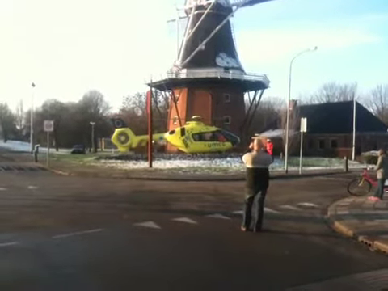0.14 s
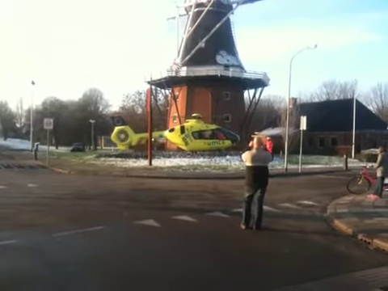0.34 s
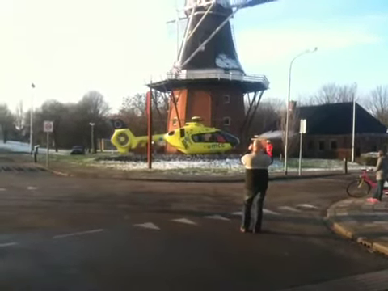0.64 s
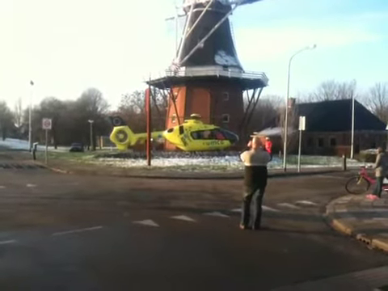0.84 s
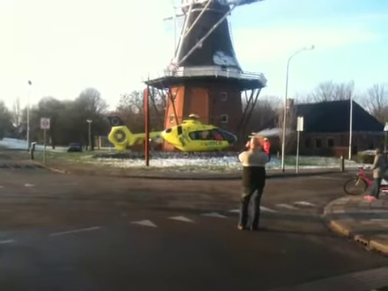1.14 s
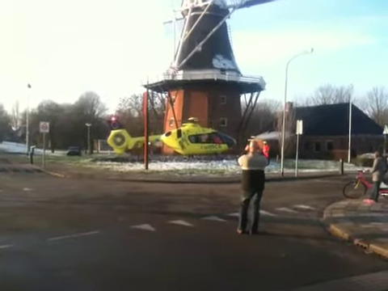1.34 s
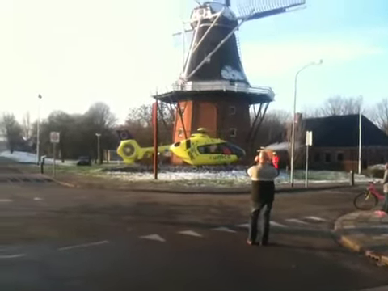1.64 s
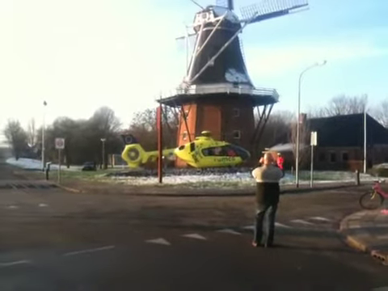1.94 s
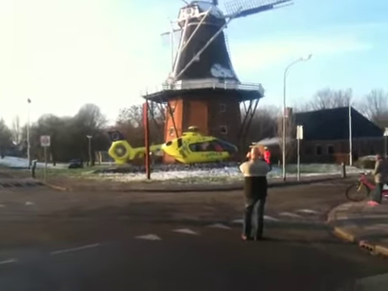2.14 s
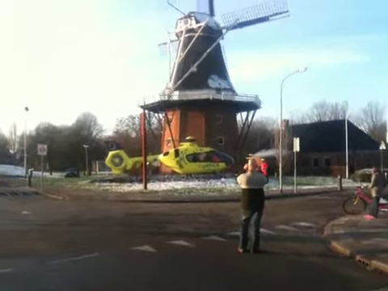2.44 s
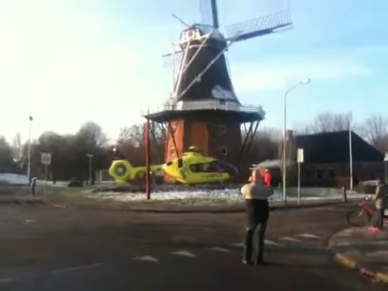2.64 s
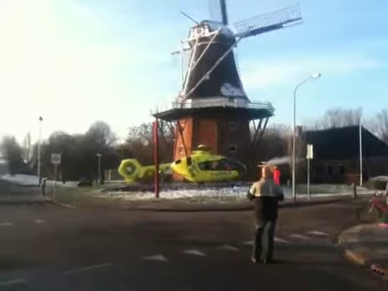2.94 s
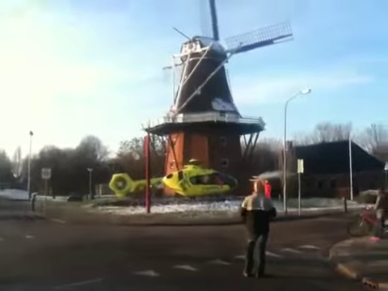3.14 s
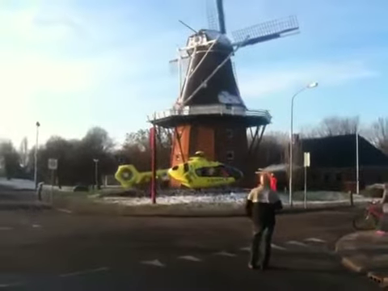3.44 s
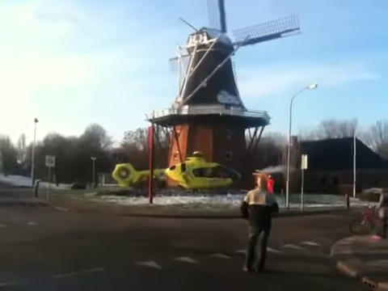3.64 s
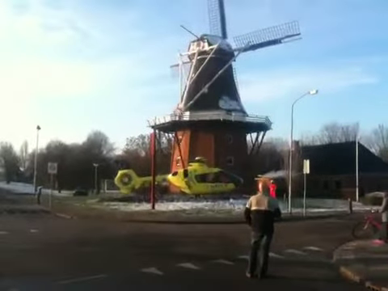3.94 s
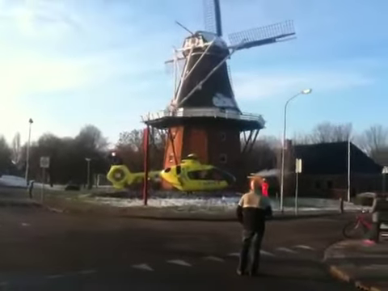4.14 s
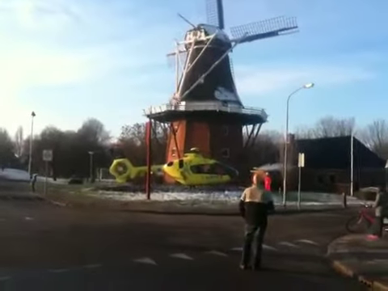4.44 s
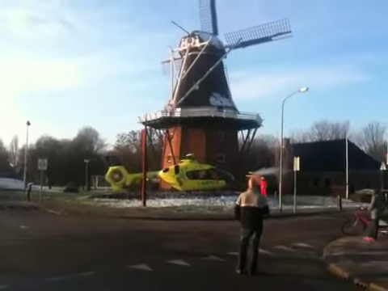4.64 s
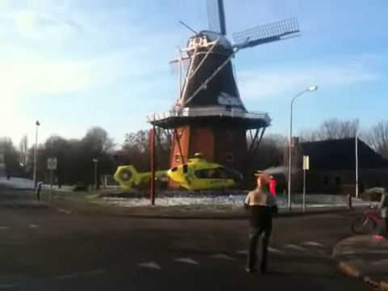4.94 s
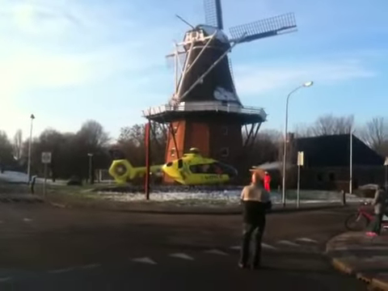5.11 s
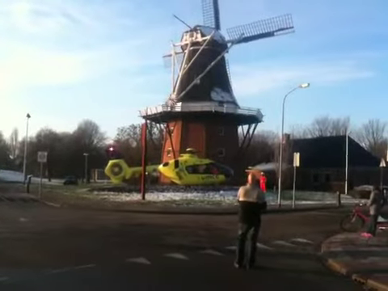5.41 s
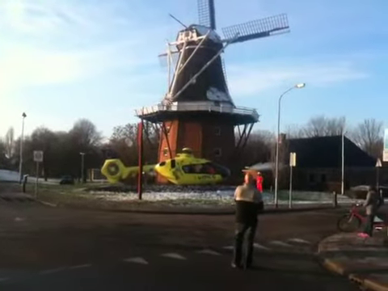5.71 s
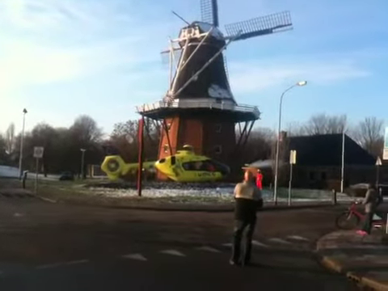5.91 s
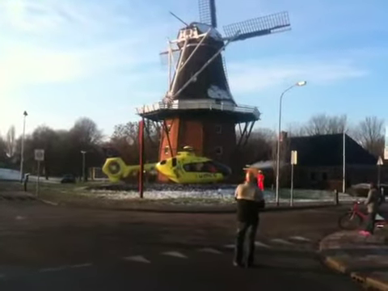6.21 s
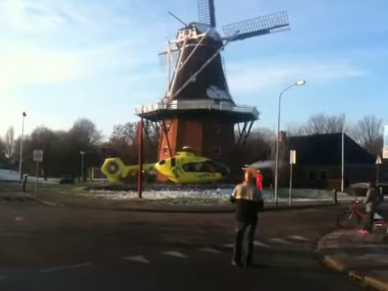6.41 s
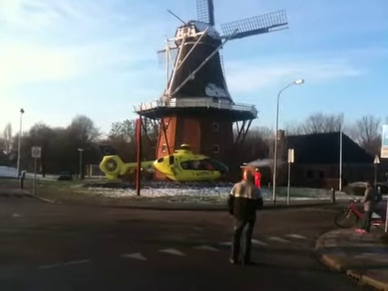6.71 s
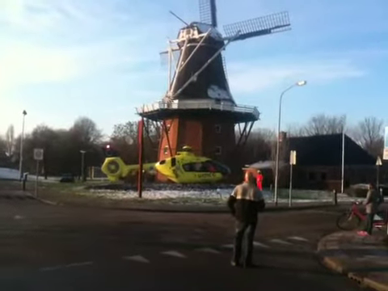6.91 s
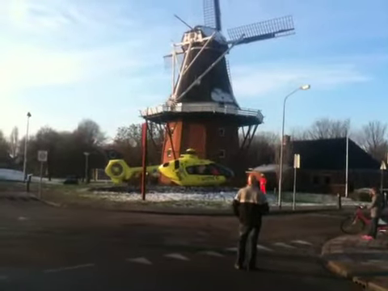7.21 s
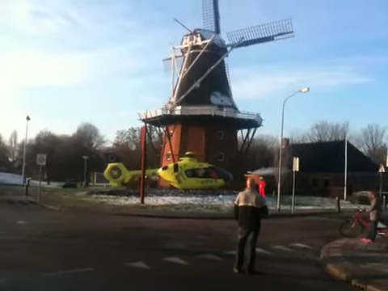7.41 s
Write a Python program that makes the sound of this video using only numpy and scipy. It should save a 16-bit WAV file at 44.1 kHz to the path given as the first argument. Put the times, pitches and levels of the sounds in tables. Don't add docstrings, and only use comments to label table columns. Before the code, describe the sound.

A helicopter stands idling across an open square, its turbines making a continuous broad jet hiss over a steady low combustor rumble, mostly around 140 to 350 Hz. Thin whines waver inside it: a very high compressor tone near 9.8 kHz and weaker gear and pump tones between 1.4 and 2 kHz. From 0 to 3.2 seconds the hiss is loud, close and hollow, coloured by a very short echo from a hand cupped by the microphone; a breathy whistle near 5 kHz opens it and fades by 0.3. At about 2.4 the hollow colour opens a little, with faint whistles around 2 and 3. Between 3.2 and 3.4 the hand leaves and the hiss drops, quieter and more natural. Until 7.5 it sways by a few decibels, swelling near 4, 5 and 6.6, dipping between, with faint whistles. Mono, with grainy, thinned treble and tiny stray side bursts.

```python
import sys
import numpy as np
from scipy import signal
from scipy.fft import rfft, irfft
from scipy.io import wavfile
from scipy.ndimage import uniform_filter1d, map_coordinates

SR = 44100
rng = np.random.default_rng(int(sys.argv[2]) if len(sys.argv) > 2 else 0)


def unload_audio(sound):
    columns = np.transpose(np.atleast_2d(sound))
    steps = np.round(np.clip(columns, -1, 1) * 32767)
    wavfile.write(sys.argv[1], SR, steps.astype(np.int16))


def to_linear_factor(level_db):
    exponent = np.asarray(level_db, float) / 20
    return 10 ** exponent


N = 333396
TIME = np.arange(N) / SR
FREQ = np.fft.rfftfreq(N, 1 / SR) + 1e-9
FRAME = 1024

# time in seconds, echo delay in ms, echo share 0-1, finger gap shut 0-1.
HAND = [
    (0, 0.31, .5, .8),
    (.13, 0.3, 0.47, .9),
    (.3, 0.3, 0.46, 0.9),
    (2.33, .29, 0.45, 1),
    (2.5, 0.3, 0.41, 0),
    (3.15, .29, 0.43, 0),
    (3.21, .36, 0.3, 0.1),
    (3.29, .55, 0.24, 0),
    (3.4, 0.94, 0, 0),
]
# time in seconds, gust in dB.
GUST = [(0, .5), (.85, -0.5), (1.5, -0.5), (1.78, -0.5), (2.62, 1.5), (3.1, 0), (3.42, -3), (4.08, 1),
        (4.27, -1), (4.95, 2), (5.2, 1), (5.32, -1.5), (5.85, 0.5), (6.15, -2), (6.57, 1.5), (7.08, -2.5),
        (7.3, 0), (7.5, -2.5)]


def curves(table):
    seconds, *columns = np.transpose(table)
    return [np.interp(TIME, seconds, column) for column in columns]


def unit(x):
    return x / np.sqrt(np.mean(x ** 2))


def walk(rate):
    hold = int(SR / rate)
    steps = np.repeat(rng.standard_normal(N // hold + 1), hold)
    return unit(uniform_filter1d(uniform_filter1d(steps, hold), hold)[:N])


def colour(points):
    hz, db = np.transpose(points)
    return to_linear_factor(np.interp(np.log(FREQ), np.log(hz), db, left=-90, right=-90))


def bump(hz, width):
    return 1 / (1 + (2 * (FREQ - hz) / width) ** 2)


def band_rms(spectrum, lo, hi):
    band = spectrum[(FREQ > lo) & (FREQ < hi)]
    return np.sqrt(2 * np.sum(abs(band) ** 2)) / N


def cup():
    full_share = 0.475
    return np.clip(curves(HAND)[1] / full_share, 0, 1)


def rumble():
    # frequency in Hz, density in dB per Hz.
    roar = [(15, -70), (25, -38), (64, -30.5), (136, -6), (237, 0.5), (284, -1.5), (335, -8.5), (533, -5),
            (647, -5.5), (741, -10), (900, -12), (1170, -46), (1980, -120)]
    noise = irfft(rfft(rng.standard_normal(N)) * colour(roar), N)
    level_db = -34 + 0.5 * walk(rate=7.6)
    return unit(noise) * to_linear_factor(level_db)


def whistles():
    # start in seconds, length in seconds, centre in Hz, width in Hz, level in dB.
    intake = [
        (0.0, 0.27, 5210, 260, -16),
        (1.848, 0.47, 5400, 600, -24.5),
        (2.75, .55, 5250, 200, -22.5),
        (4.0, 1.1, 5280, 360, -35),
        (4.85, .5, 4780, 300, -30),
        (5.4, 1.7, 4850, 420, -31.5),
        (7.05, 0.43, 4300, 200, -35),
        (4.6, 0.7, 7500, 250, -35),
    ]
    out, air = 0, rfft(rng.standard_normal(N))
    for start, length, hz, width, db in intake:
        swell = np.sin(np.pi * np.clip((TIME - start) / length, 0, 1)) ** 0.67
        whistle = unit(irfft(air * bump(hz, width), N))
        out = out + whistle * swell * to_linear_factor(db + 1.4 * walk(rate=8))
    return out


def whine(hz, jitter_hz, db, lift_db, sway, fading_db):
    phase = 2 * np.pi * np.cumsum(hz + jitter_hz * walk(rate=25)) / SR
    level_db = db + lift_db * cup() + sway * curves(GUST)[0] + fading_db * walk(rate=9)
    return np.sqrt(2) * to_linear_factor(level_db) * np.sin(phase)


def whines():
    pitches = [9816, 1672, 2030, 1414]
    # jitter in Hz, level in dB, lift by the hand in dB, share of the gust, fading in dB.
    machines = [
        (4, -40, 2.5, 1.7, 1),
        (1.5, -46, 7, .3, 2),
        (1.2, -44.5, 4.5, .3, 2),
        (1.5, -55.5, 12.5, .3, 2),
    ]
    return sum(whine(hz, *machine) for hz, machine in zip(pitches, machines))


def cupped(x):
    # centre in Hz, width in Hz, level against the hiss in dB.
    hollow = [(5210, 190, -10.5), (3780, 140, -13), (5850, 340, -9), (1643, 290, -15)]
    delay_ms, share, _ = curves(HAND)
    share = np.clip(share, 0, 0.95)
    lag = delay_ms * SR / 1000
    echo_top_hz = 19600
    dull = irfft(rfft(x) / (1 + (FREQ / echo_top_hz) ** 2), N)
    first = map_coordinates(dull, [np.arange(N) - lag], order=3, mode="wrap")
    second = map_coordinates(dull, [np.arange(N) - 2 * lag], order=3, mode="wrap")
    resonance = sum(to_linear_factor(db) * unit(bump(hz, width)) for hz, width, db in hollow)
    ring = irfft(rfft(rng.standard_normal(N)) * resonance, N) * to_linear_factor(1.4 * walk(rate=9))
    twice = 0.5 * share ** 2
    power = 1 + share ** 2 + twice ** 2 + 1.56 * share ** 2
    return (x - share * first + twice * second + 2 * share * ring) / np.sqrt(power)


def jet():
    # frequency in Hz, density in dB per Hz.
    exhaust = [(700, -28.5), (1000, -8.5), (1500, -12.5), (1850, -15), (2300, -10.5), (2750, -11),
               (3080, -15.5), (3600, -5.5), (4800, -4), (6500, -4), (9000, -7), (12000, -9.5), (14500, -13),
               (15750, -16.5)]
    # centre in Hz, width in Hz, lift in dB.
    ducts = [(1265, 185, 2.5), (2700, 150, 3.5), (3635, 170, 3), (4280, 176, 3.5), (4820, 226, 3.5),
             (5300, 125, 4), (7520, 260, 2.5)]
    # offset in dB, lift by the hand in dB, share of the gust.
    parts = [
        (2.5, 2.5, .3),
        (0, 7.0, 1.05),
        (.3, 7, 1.12),
    ]
    shape = colour(exhaust) * to_linear_factor(sum(db * bump(hz, width) for hz, width, db in ducts))
    source = rfft(rng.standard_normal(N)) * shape
    heard = rfft(cupped(irfft(source / band_rms(source, 3400, 7000), N)))

    closed, gust_db = cup(), curves(GUST)[0]
    low_db, mid_db, top_db = (db + lift_db * closed + sway * gust_db for db, lift_db, sway in parts)
    shade_db = -1.5 * closed
    gap_db = -5.5 * curves(HAND)[2]
    gap_hz, gap_octaves = 2650, 0.2
    shared = walk(rate=14)
    out = 0
    for centre in np.arange(np.log2(700), np.log2(20000), 1 / 3):
        band = np.clip(1 - 3 * abs(np.log2(FREQ) - centre), 0, 1)
        low = np.clip((np.log2(3300) - centre) * 3, 0, 1)
        top = np.clip((centre - np.log2(6200)) * 3, 0, 1)
        db = -24 + mid_db + low * (low_db - mid_db) + top * (top_db - mid_db)
        db = db + shade_db * (centre > np.log2(12500))
        db = db + gap_db * np.exp(-((centre - np.log2(gap_hz)) / gap_octaves) ** 2)
        flicker_db = 0.63 * shared + 0.57 * walk(rate=5) + top * 0.93 * walk(rate=16)
        out = out + irfft(heard * band, N) * to_linear_factor(db + flicker_db)
    return out


def scene():
    mono = rumble() + whistles() + whines() + jet()
    return np.array([mono, mono])


def starved(x):
    # frequency in Hz, level against the loudness in dB.
    floor = [(9000, -14), (10300, -7.5), (12000, -8), (13200, -10), (14600, -6.8), (15700, -7.5)]
    hz, _, z = signal.stft(x, SR, "cosine", 2 * FRAME, FRAME)
    power = abs(z) ** 2
    loudness = power[hz > 4000].mean(axis=0)
    line = to_linear_factor(2 * np.interp(hz, *np.transpose(floor), left=-200))[:, None] * loudness
    patch = uniform_filter1d(uniform_filter1d(power, size=5, axis=0), size=2, axis=1)
    return signal.istft(z * (patch > line), SR, "cosine", 2 * FRAME, FRAME)[1][:N]


def fills():
    # time in seconds, low edge in Hz, high edge in Hz, side level in dB.
    bursts = [(0.373, 4597, 5727, -19.6), (1.696, 6223, 7633, -30.6), (1.696, 10960, 12446, -31.3),
              (3.369, 13049, 14524, -42.6), (3.928, 4155, 6341, -29), (3.996, 6223, 7633, -32.6),
              (4.206, 4200, 5221, -34), (4.275, 5620, 6912, -32.2), (4.275, 7536, 9000, -33.3),
              (4.974, 5630, 6912, -32.3), (5.507, 5630, 6912, -31.1), (5.877, 8204, 9700, -33.3),
              (6.249, 5160, 6319, -32.5), (6.505, 4210, 5200, -29), (7.155, 5620, 6933, -33.6),
              (7.155, 7547, 11078, -30), (7.385, 6190, 7622, -33.2)]
    side = np.zeros(N)
    hz = np.fft.rfftfreq(2 * FRAME, 1 / SR)
    window = np.sin(np.pi * (np.arange(2 * FRAME) + 0.5) / (2 * FRAME)) ** 2
    for seconds, lo, hi, db in bursts:
        start = int(seconds * SR) - FRAME
        noise = rfft(rng.standard_normal(2 * FRAME))
        burst = unit(irfft(noise * ((hz > lo) & (hz < hi)))) * window
        side[start:start + 2 * FRAME] += to_linear_factor(db + 1.5) * burst
    return np.array([side, -side])


def roll_off(x):
    return signal.sosfilt(signal.butter(12, 16970, fs=SR, output="sos"), x)


def record(dry):
    mix = starved(dry[0]) + fills()
    return roll_off(mix)


dry = scene()
out = record(dry)
unload_audio(out)
```